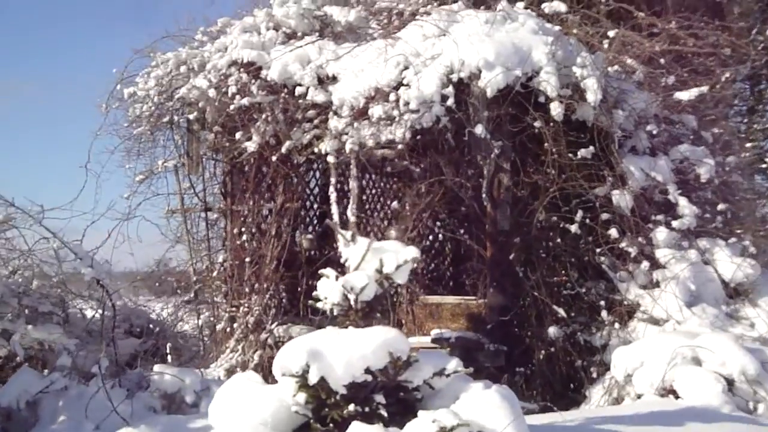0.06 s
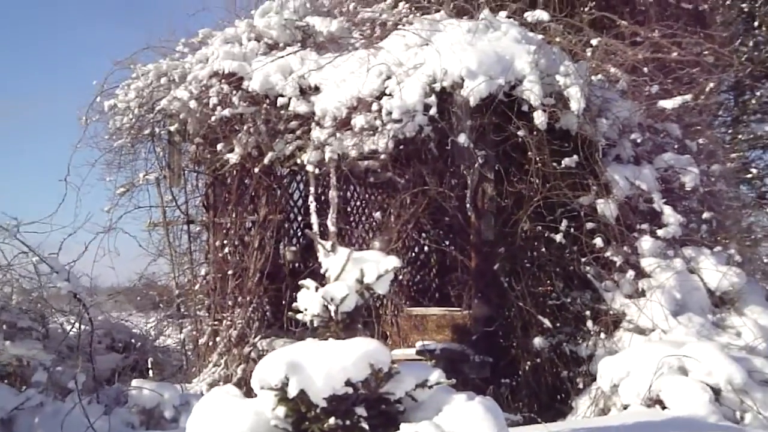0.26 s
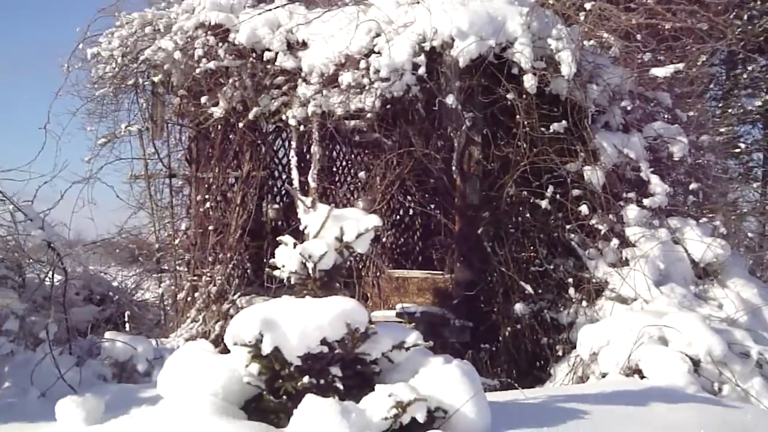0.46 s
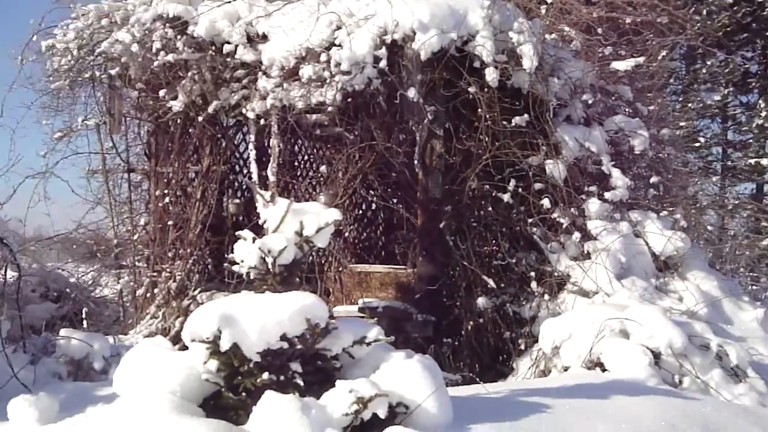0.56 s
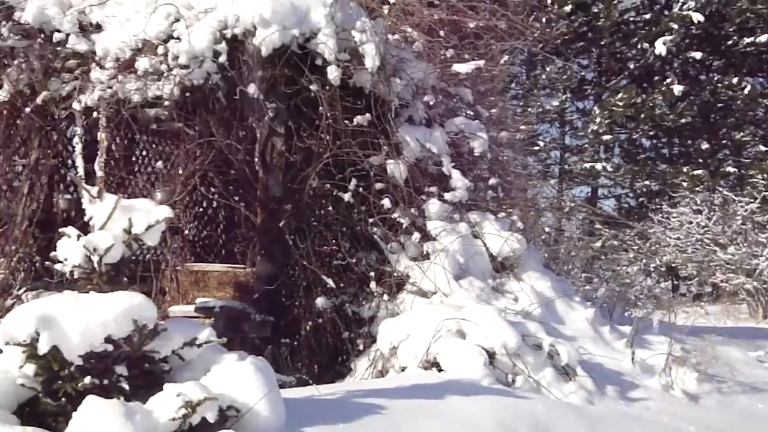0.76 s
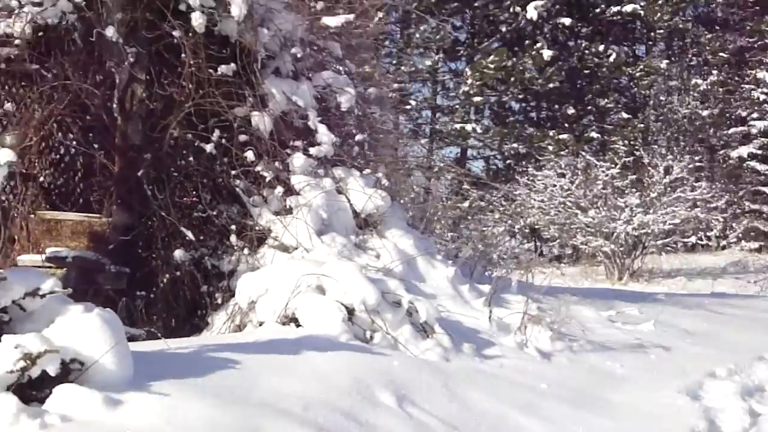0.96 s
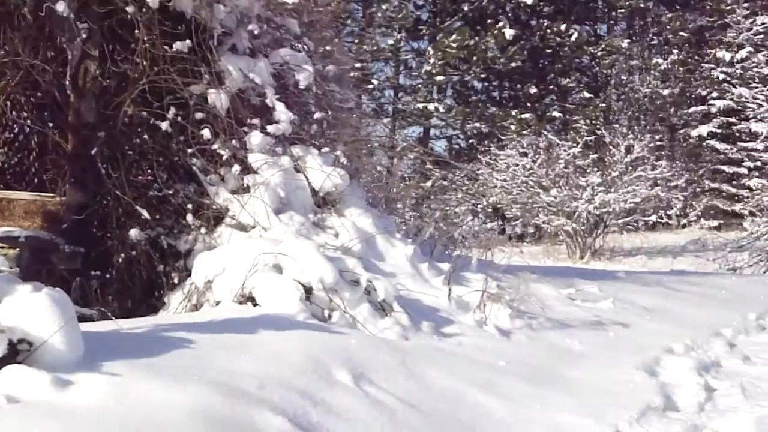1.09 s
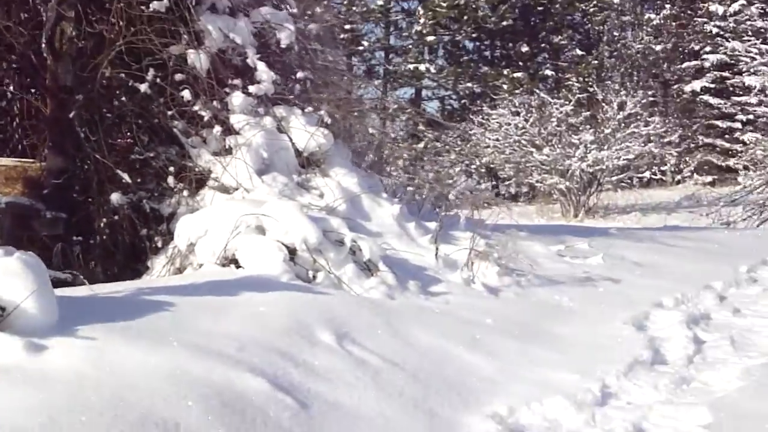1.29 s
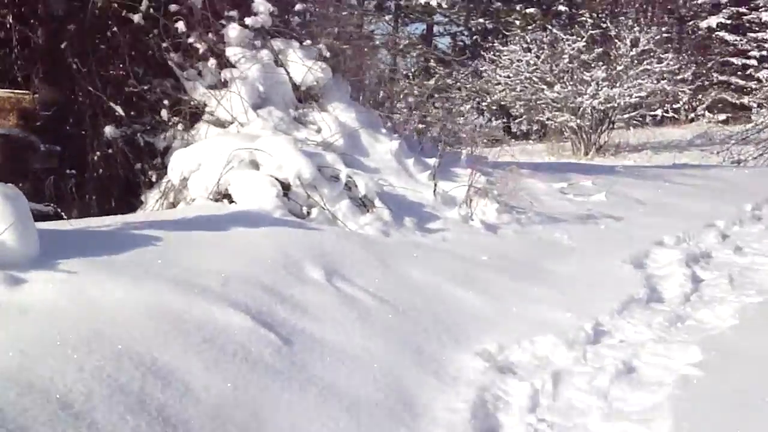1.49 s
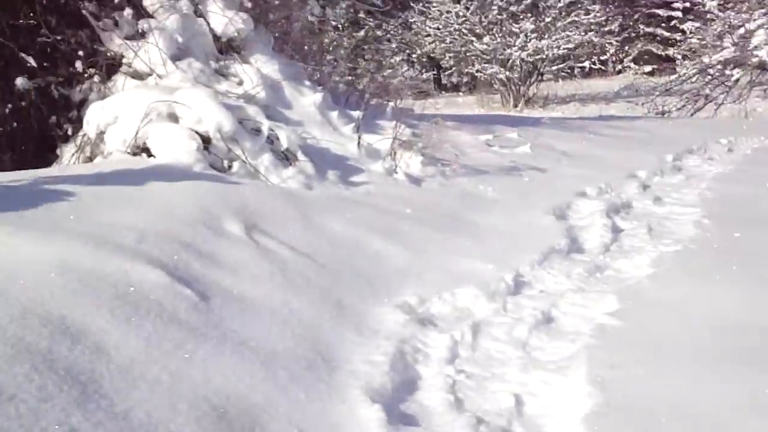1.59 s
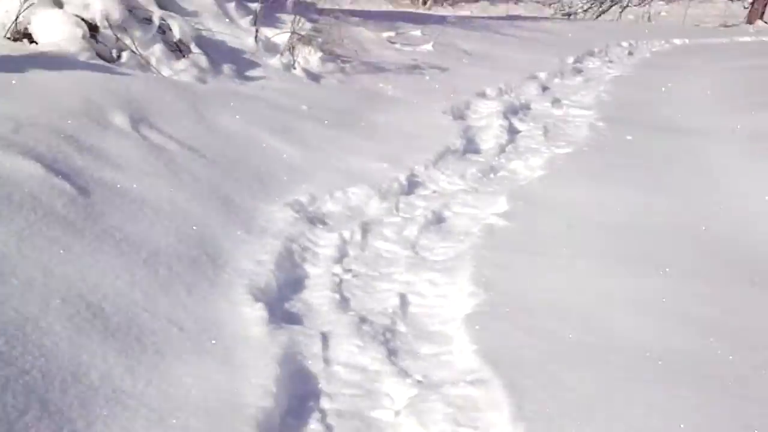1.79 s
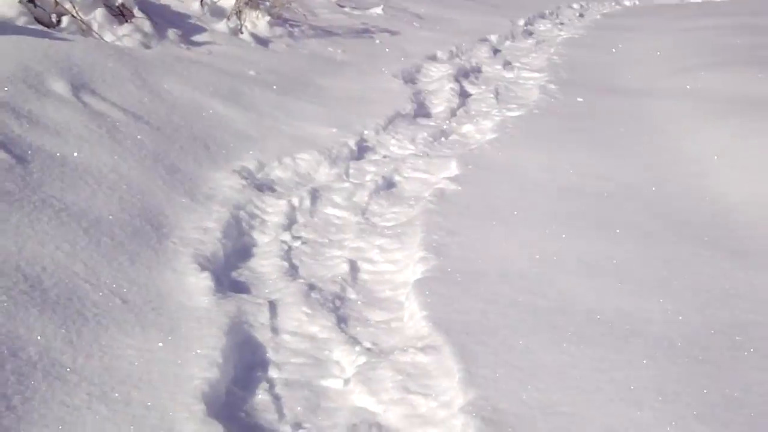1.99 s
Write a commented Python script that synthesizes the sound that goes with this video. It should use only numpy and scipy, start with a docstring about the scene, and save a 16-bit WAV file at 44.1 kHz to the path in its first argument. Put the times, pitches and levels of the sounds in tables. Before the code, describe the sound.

Boots press into cold powder snow, squeaky-crackly and muffled, one step then another, light scuffs between; open air, no echo, close hand-held microphone with low bumps over constant hiss and thin electronic buzz.

```python
"""In the open air, close by: two slow footsteps in deep, cold snow, and the start of a third.
Each boot crushes random grains into a dull crunch and a powder hiss, with sharp little slips made
from damped resonances; light scuffs add short bursts. A few hard ticks ring in quickly dying tones.
The hand-held microphone adds a noise rumble and soft knocks as it turns, over a steady filtered-noise
hiss and a faint electronic buzz of repeated high ticks."""
import sys
import numpy as np
from scipy import signal
from scipy.io import wavfile

SR = 44100
rng = np.random.default_rng(int(sys.argv[2]) if len(sys.argv) > 2 else 0)


def inscribe(sig):
    """Save sig as 16-bit PCM at rate SR to the path in sys.argv[1].

    A 1-D sig is mono; a 2-D sig holds one channel per row.
    Samples are clipped to [-1, 1] before scaling.
    """
    pcm = np.round(np.clip(np.atleast_2d(sig).T, -1, 1) * 32767)
    wavfile.write(sys.argv[1], SR, pcm.astype(np.int16))


N = 90404
TIME = np.arange(N) / SR  # seconds

# The snow giving way under the boot: start_s, peak_level_db, pitch_hz, resonance_q (no unit)
SNOW_SLIPS = [(0.1268, -31, 450, 1.64), (0.1778, -36.5, 480, 1.6), (0.1996, -36, 550, 2),
              (0.2197, -40, 640, 2.8), (0.2448, -35.5, 477, 4.2), (0.2645, -34.5, 494, 2.5),
              (0.2842, -32.5, 494, 2), (0.296, -45, 520, 2), (0.3021, -27.5, 463, 1.3),
              (0.3142, -30, 680, 3.9), (0.3213, -25, 500, 1.2), (0.3451, -27.5, 1050, 8.4),
              (0.368, -31.5, 560, 2.3), (0.4317, -26.5, 860, 3.1), (0.445, -30, 415, 2),
              (0.454, -25, 410, 1.7), (0.4632, -41, 1500, 1.2), (0.4717, -21, 550, 1.5),
              (0.4854, -20, 540, 1.4), (0.501, -25.5, 640, 1.4), (0.5205, -17.5, 755, 1.9),
              (0.5963, -16.5, 765, 1.7), (0.6533, -16.5, 985, 4.2), (0.6546, -20, 420, 1.8),
              (0.7607, -36, 1000, 1.7), (0.9078, -28.5, 920, 2.8), (0.9157, -27, 860, 1.3),
              (1.1332, -37, 1500, 2), (1.156, -32, 820, 1.4), (1.1864, -33, 380, 2.5),
              (1.2395, -24, 1080, 3.4), (1.2457, -41, 2000, 1.6), (1.2622, -32, 670, 0.79),
              (1.2998, -19, 550, 1.1), (1.3217, -27, 670, 2), (1.3352, -17.5, 656, 1.15),
              (1.3531, -18.5, 720, 2.3), (1.3634, -24.5, 696, 0.87), (1.3823, -18, 1010, 1.2),
              (1.5137, -21.5, 640, 0.91), (1.5262, -14.5, 1220, 3.3), (1.5425, -23.5, 1810, 4),
              (1.5633, -24.5, 780, 1.6), (1.5695, -24.5, 587, 1.8), (1.5788, -15.5, 1310, 3.1),
              (1.5803, -24.5, 590, 1.1), (1.6283, -38, 800, 0.99), (1.6488, -34.5, 1300, 1.6),
              (1.6934, -32, 1990, 0.78), (1.7062, -21, 794, 0.81), (1.7148, -32, 1150, 1.5),
              (1.7251, -30, 474, 2), (1.7296, -32.5, 630, 1.6), (1.7435, -27, 444, 2.1),
              (1.7751, -21.5, 615, 0.89), (1.7773, -15.5, 1200, 3), (1.7857, -32, 615, 2.1),
              (1.7932, -32, 770, 1.1)]
# Weight on the snow, one curve per tread: time_s, crunch_level_db
FIRST_TREAD = [(.08, -63), (.27, -51.5), (.32, -44.5), (.41, -45), (.47, -39), (.58, -41), (.645, -41.5),
               (.664, -70)]
SECOND_TREAD = [(1.285, -54), (1.33, -39.5), (1.43, -40.5), (1.52, -41.5), (1.575, -43.5), (1.6, -48.5),
                (1.67, -73)]
THIRD_TREAD = [(1.93, -70), (1.98, -55.5), (2.06, -53.5)]
# Light scuffs of a boot: centre_s, half_length_s, crunch_level_db
BOOT_SCUFFS = [(0.709, 0.01, -40.5), (0.74, 0.0073, -47), (.761, 0.0071, -51), (0.809, 0.0058, -44.5),
               (0.897, 0.0072, -50), (0.915, 0.0068, -39.5), (0.984, 0.0063, -48.5), (1.156, 0.014, -47.5),
               (1.192, 0.014, -42), (1.246, 0.012, -49), (1.275, 0.0086, -42.5), (1.709, 0.0048, -41),
               (1.744, 0.0052, -49), (1.785, 0.026, -47)]
# Fine powder pushed aside by the boots: time_s, hiss_level_db
POWDER_HISS = [(.2, -72), (.32, -59), (.41, -68), (.46, -57), (.6, -55), (.65, -58), (.67, -86),
               (1.305, -64), (1.322, -49.5), (1.345, -48.5), (1.39, -51), (1.44, -47.5), (1.475, -54.5),
               (1.51, -50), (1.58, -57.5), (1.63, -83), (1.93, -82), (1.99, -60), (2.06, -59)]
# Hard little ticks, perhaps twigs or an icy crust: start_s, strength_db, tilt_db_per_octave
# (the tilt counts octaves above the second ringing tone)
HARD_TICKS = [(0.882, 0.5, -1.5), (1.7083, -27, 19.5)]
# Tones in which every tick rings: pitch_hz, level_db (before strength and tilt), time_to_fall_60_db_s
TICK_TONES = [(904, -30.5, 0.019), (2040, -24.5, 0.013), (2520, -27.5, 0.01), (3170, -29, 0.0077),
              (4650, -33.5, 0.0029)]
# Handling rumble: time_s, level_db
HANDLING_RUMBLE = [(.85, -81), (.89, -48), (.94, -58.5), (.99, -48), (1.025, -64), (1.08, -36),
                   (1.135, -59), (1.16, -45), (1.24, -51.5), (1.28, -41), (1.37, -41), (1.5, -48.5),
                   (1.6, -48.5), (1.64, -59), (1.69, -52.5), (1.76, -82)]
# Soft knocks on the microphone body: start_s, peak_level_db, pitch_hz, resonance_q (no unit)
MICROPHONE_KNOCKS = [(1.081, -24.5, 199, 4), (1.098, -28.5, 259, 1.7), (1.47, -25.5, 200, 1.33)]
# Tone colours, where only the shape counts: pitch_hz, level_db (per Hz)
CRUNCH_COLOUR = [(60, -45), (120, -16.5), (270, -0.5), (550, -3), (1000, -3), (1900, -5.5), (2600, -9.5),
                 (3400, -30.5), (5000, -71)]
POWDER_COLOUR = [(1500, 5), (3300, -8.5), (4800, 0), (6500, -6.5), (8500, -8.5), (11000, -11)]
RUMBLE_COLOUR = [(25, -28), (48, -18), (68, -3), (90, 2.5), (140, -5), (220, -8.5), (350, -12.5),
                 (700, -45)]
AIR_COLOUR = [(30, -14), (80, -12), (140, -3.5), (350, -1.5), (700, -2), (1200, -4), (2000, -6),
              (3000, -10.5), (4400, -14.5), (5500, -10), (6700, -15.5), (11000, -17.5)]

# Snow grains: average number per second, and how unequal their sizes are
CRUNCH_GRAINS_PER_S, POWDER_GRAINS_PER_S, GRAIN_SPREAD_DB = 3200, 7200, 2.5
CLUMP_DB, CLUMP_RATE_HZ = 1.5, 190  # grains break in small clumps
SCUFF_POWDER_DB = -12.5  # powder in a scuff, relative to its crunch
# How much each sound's tone colour flickers
CRUNCH_FLICKER_DB, POWDER_FLICKER_DB, RUMBLE_FLICKER_DB, AIR_FLICKER_DB = 1.6, 1.8, 1.5, 1.52
# Slips: bass removed, kick rounded by the soft snow, treble muffled
SLIP_LOW_HZ, SLIP_SOFT_HZ, SNOW_MUFFLE_HZ = 423, 1950, 2880
KNOCK_LOW_HZ, KNOCK_SOFT_HZ, KNOCK_MUFFLE_HZ = 70.4, 700, 542
AIR_DB = -54
BUZZ_PER_S, BUZZ_START_S, BUZZ_WIDTH_S = 60.0, .0083, 0.00063
BUZZ_HZ, BUZZ_JITTER_RAD = 8530, .6
BUZZ_DB, BUZZ_FLICKER_DB = -50, 2.0
CUTOFF_HZ = 10950


def boots():
    """Weight crushes grains into a dull crunch and a fine powder hiss, with sharp slips on top."""
    load = gain_curve(FIRST_TREAD) + gain_curve(SECOND_TREAD) + gain_curve(THIRD_TREAD)
    scuffs = np.zeros(N)
    for centre_s, half_s, level_db in BOOT_SCUFFS:
        scuffs += from_db(level_db) * np.exp(-((TIME - centre_s) / half_s) ** 2)
    clumps = from_db(CLUMP_DB * drift(CLUMP_RATE_HZ))
    crunch_grains = [clumps * grains(CRUNCH_GRAINS_PER_S, GRAIN_SPREAD_DB) for _ in range(2)]
    crunch = coloured(crunch_grains, CRUNCH_COLOUR, CRUNCH_FLICKER_DB)
    powder_grains = [clumps * grains(POWDER_GRAINS_PER_S, GRAIN_SPREAD_DB) for _ in range(2)]
    powder = coloured(powder_grains, POWDER_COLOUR, POWDER_FLICKER_DB)
    powder_gain = gain_curve(POWDER_HISS) + scuffs * from_db(SCUFF_POWDER_DB)
    slips = pulses(SNOW_SLIPS, SLIP_LOW_HZ, SLIP_SOFT_HZ, SNOW_MUFFLE_HZ)
    return (load + scuffs) * crunch + powder_gain * powder + slips


def ticks():
    """Short snaps, each ringing in the same few quickly dying tones."""
    out = np.zeros(N)
    second_tone_hz = TICK_TONES[1][0]
    for start_s, strength_db, tilt_db in HARD_TICKS:
        age = np.maximum(TIME - start_s, 0)  # zero, so silent, until the tick starts
        for k, (pitch_hz, tone_db, fall_s) in enumerate(TICK_TONES):
            level_db = strength_db + tone_db + tilt_db * np.log2(pitch_hz / second_tone_hz)
            fading = from_db(level_db - 60 * age / fall_s)
            sign = (-1) ** k  # neighbouring tones start in opposite directions
            out += sign * fading * np.sin(2 * np.pi * pitch_hz * age)
    return out


def handling():
    """Moving the microphone in the hand gives a lumpy noise rumble and a few soft, ringing knocks."""
    noise = rng.standard_normal((2, N))
    rumble = gain_curve(HANDLING_RUMBLE) * coloured(noise, RUMBLE_COLOUR, RUMBLE_FLICKER_DB)
    return rumble + pulses(MICROPHONE_KNOCKS, KNOCK_LOW_HZ, KNOCK_SOFT_HZ, KNOCK_MUFFLE_HZ)


def air_hiss():
    """Still air and microphone hiss: steady noise with a gently flickering colour."""
    noise = rng.standard_normal((2, N))
    return from_db(AIR_DB) * coloured(noise, AIR_COLOUR, AIR_FLICKER_DB)


def electronic_buzz():
    """Short high tone bursts repeat evenly; their level and phase wander, so the buzz is unsteady."""
    cycles = (TIME - BUZZ_START_S) * BUZZ_PER_S
    from_burst_s = ((cycles + .5) % 1 - .5) / BUZZ_PER_S  # time from the nearest burst centre
    envelope = np.exp(-(from_burst_s / BUZZ_WIDTH_S) ** 2)
    tone = np.sin(2 * np.pi * BUZZ_HZ * from_burst_s + BUZZ_JITTER_RAD * drift(40))
    return from_db(BUZZ_DB + BUZZ_FLICKER_DB * drift(15)) * envelope * tone


def from_db(db):
    """Turn decibels into a gain."""
    return 10 ** (np.asarray(db) / 20)


def rms_one(x):
    """Scale to an average strength (rms) of 1."""
    return x / np.sqrt(np.mean(x ** 2) + 1e-20)


def gain_curve(rows):
    """Join (time_s, level_db) points into a gain, practically silent outside them."""
    time_s, level_db = np.transpose(rows)
    return from_db(np.interp(TIME, time_s, level_db, left=-120, right=-120))


def butter(x, hz, kind, order):
    """Filter with a smooth (Butterworth) response, looking only at the past."""
    sections = signal.butter(order, hz, kind, fs=SR, output="sos")
    return signal.sosfilt(sections, x + 1e-18)


def drift(rate_hz):
    """Slow random wander with rms 1, made by smoothing noise twice."""
    step = 40  # one slow value per 40 samples
    memory = np.exp(-2 * np.pi * rate_hz * step / SR)
    noise = rng.standard_normal(N // step + 2002)
    slow = signal.lfilter([1], [1, -2 * memory, memory ** 2], noise)[2000:]  # skip the settling
    return np.interp(np.arange(N) / step, np.arange(len(slow)), rms_one(slow))


def grains(per_s, spread_db):
    """Random clicks of either sign, many small and a few large."""
    size_db = spread_db * np.minimum(rng.exponential(1, N), 5)
    sizes = from_db(size_db) * rng.choice([-1, 1], N)
    return sizes * (rng.random(N) < per_s / SR)


def coloured(sources, colour, flicker_db):
    """Shape two sources, in alternate third-octave bands, each band flickering a little; rms 1."""
    hz, db = np.transpose(colour)
    edges = 22 * 2 ** (np.arange(29) / 3)
    out, together = 0, drift(38)
    for k, (low, high) in enumerate(zip(edges, edges[1:])):
        log_middle = np.log(low * high) / 2
        level_db = np.interp(log_middle, np.log(hz), db, left=-70)
        band = butter(sources[k % 2], [low, high], "band", order=3)
        flicker = 0.64 * together + 0.76 * drift(24)  # partly shared by all bands
        out = out + band * from_db(level_db + flicker_db * flicker)
    return rms_one(out)


def pulses(rows, low_hz, soft_hz, muffle_hz):
    """Each row kicks a damped resonance, heard through a muffling layer."""
    out = np.zeros(N + SR)
    kick = butter(signal.unit_impulse(SR // 10), soft_hz, "low", order=1)
    for start_s, peak_db, pitch_hz, q in rows:
        ring = signal.lfilter(*signal.iirpeak(pitch_hz, q, SR), kick)
        thinned = butter(ring, low_hz, "high", order=1)
        pulse = butter(thinned, muffle_hz, "low", order=8)
        start = int(start_s * SR)
        out[start:start + len(kick)] -= from_db(peak_db) * pulse / np.abs(pulse).max()
    return out[:N]


def scene():
    """Add everything at one microphone; the snow returns no echo."""
    background = air_hiss() + electronic_buzz()
    return (boots() + ticks() + handling() + background)[None]


def record(dry):
    """Cut the top treble steeply."""
    steep_cut = signal.ellip(12, .2, 70, CUTOFF_HZ, fs=SR, output="sos")  # ripple dB, stop depth dB
    return signal.sosfilt(steep_cut, dry)


dry = scene()
out = record(dry)
inscribe(out)
```